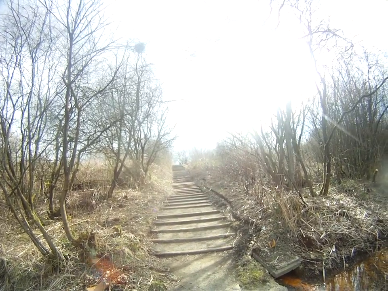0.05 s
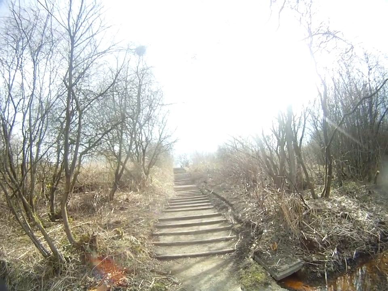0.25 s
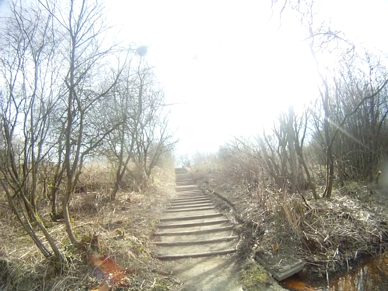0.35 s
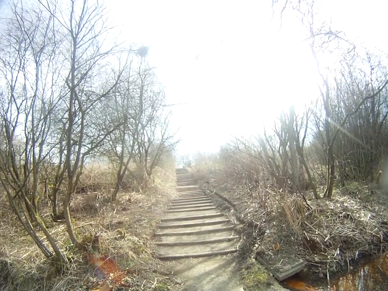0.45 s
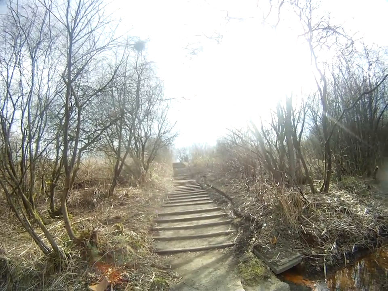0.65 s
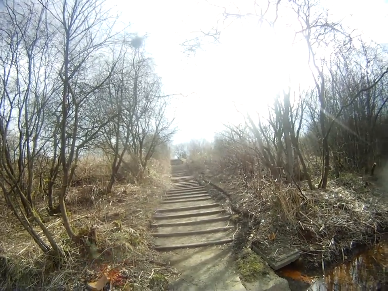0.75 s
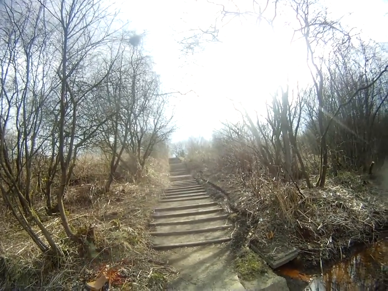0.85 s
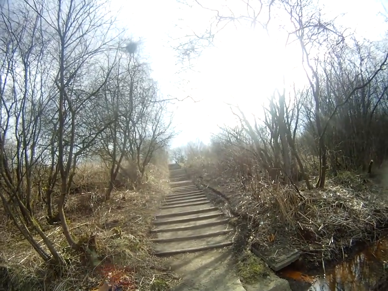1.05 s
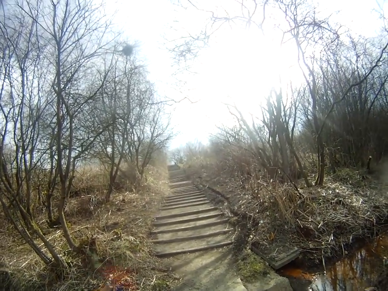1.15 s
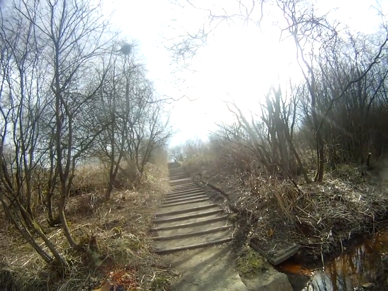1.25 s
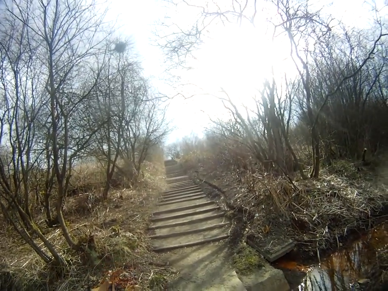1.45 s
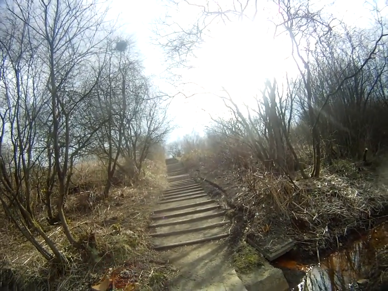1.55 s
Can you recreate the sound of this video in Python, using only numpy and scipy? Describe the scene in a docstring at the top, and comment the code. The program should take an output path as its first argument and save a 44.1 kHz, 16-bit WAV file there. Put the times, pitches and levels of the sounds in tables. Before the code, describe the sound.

A short, loud scrape against the microphone with soft bumps, then faint rustling outdoors.

```python
"""A rub on a bike camera

Something, probably a glove, drags over the case of a camera on a bike halted beside a dirt path.
It sticks and slips in tiny catches that make the case ring: a light brush, a hard scrape, then release.
Afterwards the mount bumps softly, the case ticks and rustles, and a faint swish passes over quiet air."""
import sys
import numpy as np
from scipy import signal
from scipy.fft import rfft, irfft
from scipy.io import wavfile

SR = 44100
rng = np.random.default_rng(int(sys.argv[2]) if len(sys.argv) > 2 else 0)


def transcribe(signal):
    """Save signal, clipped to [-1, 1], as a 16-bit WAV file at the path in sys.argv[1]."""
    frames = np.atleast_2d(signal).T
    limited = np.clip(frames, -1, 1)
    pcm = np.round(limited * 32767).astype(np.int16)
    wavfile.write(sys.argv[1], SR, pcm)


N = 70560  # 1.6 seconds

# The tones at which the case rings. Each row: pitch in Hz, width in Hz, boost in dB.
CASE_TONES = [(1029, 18, 5), (1118, 12, -2), (1154, 12, -1), (1196, 12, -4), (1260, 12, -5), (1562, 14, -2),
              (1633, 14, -1), (1890, 11, 11), (1954, 12, -2), (2018, 12, 1), (2137, 12, 0), (2605, 15, 8),
              (2762, 16, 3), (2887, 16, 3), (3160, 18, 1), (3292, 24, 8), (3578, 14, 7), (3637, 18, 2),
              (8423, 22, 3), (10110, 14, 6), (13890, 14, 6)]


def rub():
    """Tiny slips make the case ring; pressing hard fills in the low mids and the higher tones."""
    # How the rub swells. Each row: time in seconds, then relative dB of the mids, low mids and treble.
    levels = [(0.0, -51.5, -66.5, -55.5), (0.054, -46, -60, -52), (0.158, -54.5, -70.5, -61),
              (0.232, -35, -48.5, -42), (0.252, -27, -35.5, -32), (0.284, -26.5, -41, -29.5),
              (0.316, -34.5, -51, -45), (0.352, -35.5, -55, -43), (0.362, -47.5, -56.5, -57.5),
              (0.402, -57.5, -80, -65), (0.414, -69, -88, -85), (0.43, -83, -86, -91)]
    # Tone of the light brush and of the hard scrape. Each row: frequency in Hz, gain in dB.
    brush_colour = [(200, -5.5), (400, -21.5), (750, -15), (900, -3), (1040, -0.5), (1180, -2),
                    (1350, -1.5), (1600, -3), (1850, 4.5), (2100, 0.5), (2400, -6.5), (2900, -11.5),
                    (3200, -13), (3550, -6.5), (3900, -17.5), (4900, -19), (5600, -22), (6000, -41),
                    (6500, -21), (7300, -23), (7900, -25.5), (8450, -12), (9200, -21), (10150, -11.5),
                    (10600, -20), (11000, -20), (11500, -39), (12500, -26), (13100, -22), (13850, -16.5),
                    (14500, -15), (15200, -27)]
    scrape_colour = [(200, -11.5), (280, -13), (400, -6.5), (550, -13), (720, -10.5), (900, -7.5),
                     (1030, 1.5), (1250, 2), (1430, -2), (1620, 2), (1950, 4.5), (2250, -6.5), (2650, -6.5),
                     (3000, -2), (3300, -4.5), (3650, -5.5), (3850, -12.5), (4250, -21), (4750, -10.5),
                     (5500, -22), (6000, -36), (6500, -24), (7200, -15), (7900, -25.5), (8500, -7.5),
                     (9600, -17.5), (10150, -10), (10900, -19), (11400, -30.5), (12000, -42), (12700, -29),
                     (13150, -17), (13900, -17), (14400, -11), (15200, -21)]
    # Hard snags in the scrape. Each row: start in seconds, strength of the extra push in dB.
    snags = [(0.2499, -3), (0.2567, 3.5), (0.2609, 5), (0.2685, 6.5), (0.2817, -12), (0.293, -23)]
    scrape_start_s, scrape_end_s, fade_s = 0.238, 0.301, 0.0061
    t = np.arange(N) / SR
    slips = catches(per_second=3000, spread_db=1.5) + undb(-5.5) * rng.standard_normal(N)
    push = 1 + sum(undb(db) * decay(start, fall_s=0.0012) for start, db in snags)
    ring = resonate(slips * push, CASE_TONES)
    # 0 while brushing, 1 while scraping.
    hard = np.clip(np.minimum(t - scrape_start_s, scrape_end_s - t) / fade_s + .5, 0, 1)
    out = 0
    for share, tone in ((1 - hard, brush_colour), (hard, scrape_colour)):
        friction = colour(ring, tone)
        lows, body = below(friction, hz=790), below(friction, hz=2720)
        mids = unit(body - lows) * undb(curve(levels) + 1)
        low_mids = unit(lows - below(lows, hz=202)) * undb(curve(levels, column=2) + 2.5)
        treble = unit(friction - body) * undb(curve(levels, column=3) + 1.5)
        out = out + share * (mids + low_mids + treble)
    return out


def mount():
    """The mount shudders while it is rubbed; each bump is a swing that dies almost at once."""
    # How hard it shudders. Each row: time in seconds, level in dB.
    shudder_levels = [(0, -50), (.028, -54), (.042, -38), (.11, -47.5), (.15, -47.5), (.21, -40.5),
                      (.25, -38), (.3, -38.5), (.35, -42), (.38, -50), (.405, -45), (.42, -63)]
    # The deep tone of the shudder. Each row: frequency in Hz, gain in dB.
    shudder_colour = [(10, -2), (34, 4.5), (55, -8.5), (85, -1.5), (135, -4.5), (190, -13), (300, -23.5),
                      (600, -60.5)]
    # Soft bumps. Each row: start in seconds, pitch in Hz, strength in dB.
    bumps = [(.033, 69.6, -36.5), (0.244, 36, -32.5), (0.279, 116, -27), (0.281, 37.8, -27.5),
             (0.397, 89, -36), (0.605, 87.4, -51.5), (0.628, 21.8, -49), (0.759, 37.5, -45),
             (0.792, 36.7, -43), (0.819, 85, -47.5), (0.87, 71, -51.5), (1.036, 52.5, -46),
             (1.2, 139, -44.5), (1.22, 51.5, -42), (1.273, 60.4, -50.5), (1.401, 34, -43),
             (1.433, 36.3, -50), (1.523, 79.6, -53)]
    rise_cycles = 0.41
    out = unit(colour(rng.standard_normal(N), shudder_colour)) * undb(curve(shudder_levels))
    for start, hz, db in bumps:
        cycles = np.maximum(np.arange(N) / SR - start, 0) * hz
        swell = cycles / rise_cycles * np.exp(1 - cycles / rise_cycles)
        out = out + undb(db) * swell * np.sin(2 * np.pi * cycles)
    return out


def case_ticks():
    """Short crackles in the case, each with one broad ring and a little hiss."""
    # The ticks. Each row: start in seconds, relative level in dB, centre of the ring in Hz.
    ticks = [(.1425, -39, 5730), (0.153, -47, 6000), (0.4844, -53, 2360), (0.5163, -48.5, 2160),
             (0.608, -52.5, 2520), (.625, -51, 2180), (0.6916, -48.5, 2150), (0.8758, -41.5, 2240),
             (0.954, -51, 3000), (1.003, -51, 2400), (1.1484, -48, 2920), (1.177, -59, 3200),
             (1.221, -49, 1960), (1.2492, -37.5, 1860), (1.469, -50, 2150)]
    # Tone of their hiss. Each row: frequency in Hz, gain in dB.
    hiss_colour = [(800, -5), (3500, -2), (5000, -10), (8000, -5), (8600, 1), (9700, 8), (10400, -3),
                   (11200, -12), (13000, -17), (14200, -1), (15200, -14)]
    # The microphone's opening makes dips in the treble. Each row: frequency in Hz, gain in dB.
    opening_colour = [(4500, -1.5), (5500, -6), (6000, -13), (6600, -9), (10500, -6.5), (12000, -12),
                      (13500, 2)]
    sharpness = 2.7  # higher gives a narrower ring
    f, out = frequencies(), 0
    push_spectrum = rfft(rng.standard_normal(N))
    hiss = undb(-5.5) * unit(colour(rng.standard_normal(N), hiss_colour))
    for start, db, hz in ticks:
        ring = unit(irfft(push_spectrum / (1 + 1j * sharpness * (f / hz - hz / f)) ** 2, N))
        out = out + undb(db) * decay(start, fall_s=0.0034) * (ring + hiss)
    return colour(out, opening_colour) / 2


def rustle():
    """A light touch on the case keeps up an uneven crackle of tiny slips."""
    # How loud the rustle is. Each row: time in seconds, level in dB.
    levels = [(.43, -85), (.57, -73), (.61, -65.5), (.66, -70), (.74, -67), (.86, -63.5), (.93, -68.5),
              (.97, -64), (1.02, -84), (1.08, -68), (1.12, -74), (1.25, -64.5), (1.6, -73.5)]
    # Its tone. Each row: frequency in Hz, gain in dB.
    tone = [(300, -13), (700, -9), (1020, 6), (1450, -8.5), (2000, 7.5), (2800, -3.5), (3550, -1.5),
            (4000, -16), (5200, -16), (6000, -22), (7000, -14), (8000, -15), (8500, -6), (9200, -8.5),
            (10100, -9), (11000, -17.5), (12000, -26), (13100, -18), (14000, -8), (15200, -12)]
    ring = resonate(catches(per_second=900, spread_db=3.0), CASE_TONES)
    return unit(colour(ring, tone)) * undb(curve(levels))


def swish():
    """A light slide: a band of rubbing noise rises and falls with its speed, with thin hiss above."""
    # The course of the slide. Each row: time in seconds, level of the band in dB, its centre in Hz.
    slide = [(1.18, -81, 1900), (1.225, -55, 2080), (1.27, -62, 2170), (1.32, -58, 2400),
             (1.345, -62, 2360), (1.385, -56, 2280), (1.425, -63.5, 2170), (1.47, -61, 2140),
             (1.51, -70.5, 2050), (1.6, -66, 2220)]
    # Narrow rings in the swish. Each row: pitch in Hz, width in Hz, boost in dB.
    rings = [(1860, 89, 1), (2815, 28, 2.5)]
    # Tone of the hiss. Each row: frequency in Hz, gain in dB.
    hiss_colour = [(700, 4), (1000, 13), (1500, 5), (5000, -21), (9000, -45), (9200, 8), (10050, 8.5),
                   (10500, -8), (11800, -30), (13200, -15), (14000, 6), (14850, 2), (15200, -10.5)]
    centre_hz, width_hz = curve(slide, column=2), 1080
    grain = catches(per_second=5000, spread_db=1.8)
    band = 0
    for hz in np.arange(1400, 3400, 200):  # slices near the moving centre sound loudest
        noise_slice = below(grain, hz + 100, steepness=40) - below(grain, hz - 100, steepness=40)
        band = band + noise_slice / (1 + (2 * (hz - centre_hz) / width_hz) ** 8)
    hiss = undb(-8.5) * unit(colour(grain, hiss_colour))
    return (unit(resonate(band, rings)) + hiss) * undb(curve(slide))


def air():
    """Quiet outdoor air: a low rush with a finely grained hiss."""
    # Tone of the rush and of the hiss. Each row: frequency in Hz, gain in dB.
    rush_colour = [(12, -42), (20, 9.5), (114, -7.5), (214, -2), (305, -4.5), (585, -7), (752, -8.5),
                   (801, -6.5), (871, -7), (988, -11.5), (3000, -8), (3900, -64), (6600, -120)]
    hiss_colour = [(1500, -12.5), (2400, -2), (3000, -2), (3550, 0.5), (3900, -3.5), (5000, -4.5),
                   (5600, -12), (6000, -22), (6700, -9), (7900, -9), (8500, -8), (9300, -12), (10100, -9),
                   (11000, -15.5), (12000, -23), (13100, -17), (14000, -10), (15200, -16.5)]
    rush = unit(below(colour(rng.standard_normal(N), rush_colour), hz=2330, steepness=8))
    grain = rng.standard_normal(N) + undb(-17) * catches(per_second=700, spread_db=4.8)
    hiss = unit(colour(grain, hiss_colour))
    return undb(-65) * rush + undb(-70.5) * hiss


def catches(per_second, spread_db):
    """Slips at random moments, most small and a few large."""
    chance, size, sign = rng.random(N), rng.exponential(size=N), rng.choice([-1, 1], N)
    return unit((chance < per_second / SR) * sign * undb(spread_db * np.minimum(size, 4)))


def resonate(push, tones):
    """Add narrow ringing tones on top of the push that sets them off."""
    f = frequencies()
    ringing = sum(undb(db) / (1 + 1j * (f * f - hz * hz) / (f * width)) for hz, width, db in tones)
    return irfft(rfft(push) * (1 + ringing), N)


def colour(x, points):
    """Shape the tone of a sound along a curve of (Hz, dB) points."""
    hz, db = np.array(points, float).T
    gain = undb(np.interp(np.log(frequencies()), np.log(np.sort(hz)), db))
    # Fold the filter forward in time, so nothing rings before its cause.
    cepstrum = irfft(np.log(gain), N)
    cepstrum[1:N // 2] *= 2
    cepstrum[N // 2 + 1:] = 0
    return irfft(rfft(x) * np.exp(rfft(cepstrum)), N)


def below(x, hz, steepness=16):
    """Keep what lies below a frequency, without delaying it."""
    return irfft(rfft(x) / (1 + (frequencies() / hz) ** steepness), N)


def decay(start, fall_s):
    """Jump to 1 at the start, then fall to about a third every fall_s seconds."""
    t = np.arange(N) / SR - start
    return (t >= 0) * np.exp(-np.abs(t) / fall_s)


def curve(table, column=1):
    """One column of a table, joined by straight lines in time."""
    rows = np.array(table, float)
    return np.interp(np.arange(N) / SR, rows[:, 0], rows[:, column])


def frequencies():
    """The frequencies of the spectrum in Hz, never less than 1."""
    return np.maximum(np.arange(N // 2 + 1) * SR / N, 1)


def undb(db):
    """Turn decibels into a number to multiply by."""
    return 10 ** (np.asarray(db) / 20)


def unit(x):
    """Scale a sound to an average (rms) level of 1."""
    return x / np.sqrt(np.mean(x ** 2))


def scene():
    """All the sources meet at one microphone."""
    return (rub() + mount() + case_ticks() + rustle() + swish() + air())[None]


def record(dry):
    """The recorder rounds the highest peaks, then cuts the deepest rumble and the highest treble."""
    ceiling, lowest_hz, highest_hz = undb(-9.5), 14, 15230
    rounded = ceiling * np.tanh(dry / ceiling)
    no_rumble = signal.sosfilt(signal.butter(1, lowest_hz, "high", fs=SR, output="sos"), rounded)
    return signal.sosfilt(signal.ellip(10, .2, 80, highest_hz, fs=SR, output="sos"), no_rumble)


dry = scene()
out = record(dry)
transcribe(out)
```